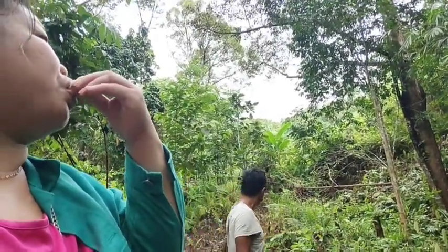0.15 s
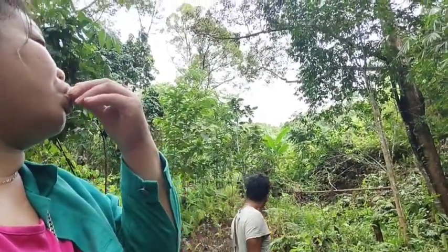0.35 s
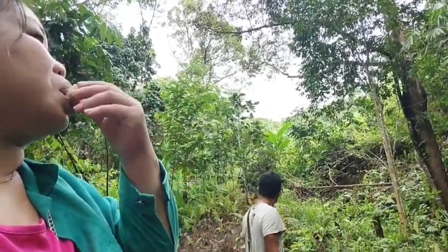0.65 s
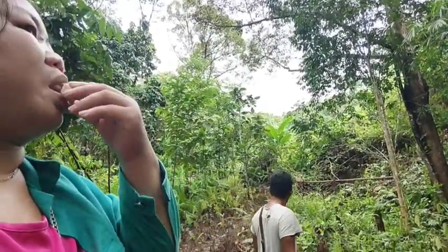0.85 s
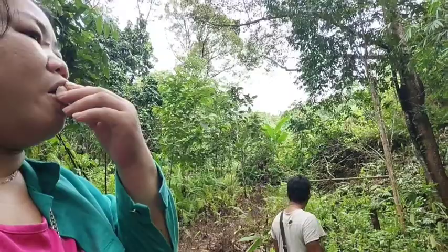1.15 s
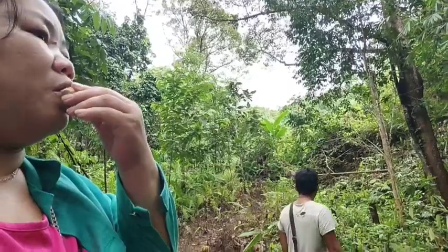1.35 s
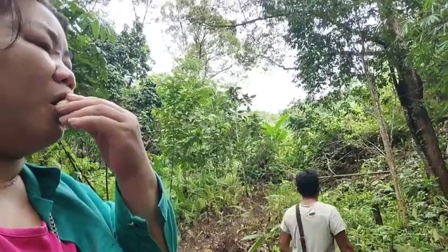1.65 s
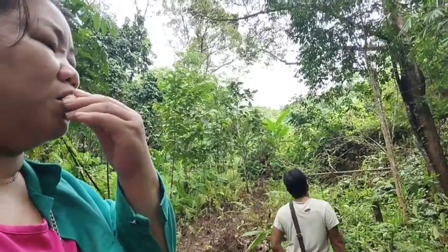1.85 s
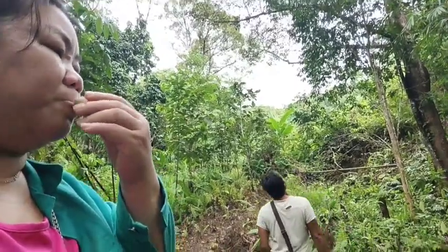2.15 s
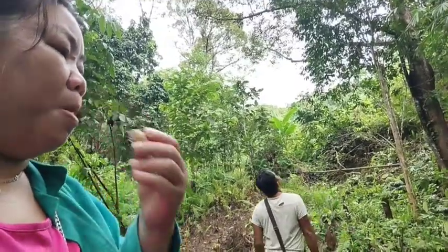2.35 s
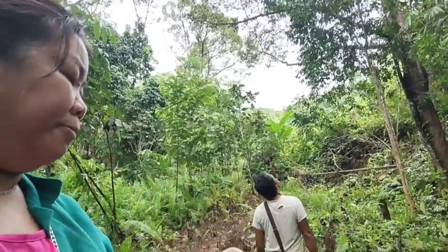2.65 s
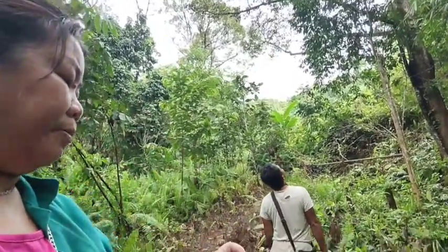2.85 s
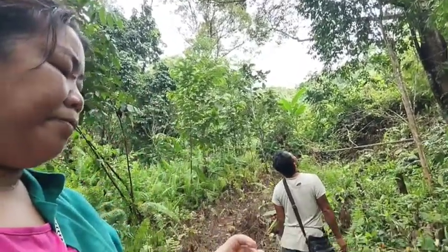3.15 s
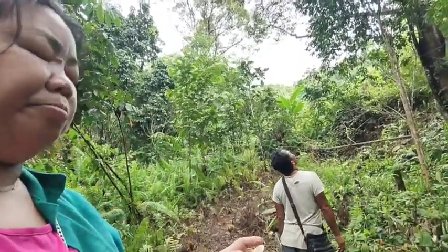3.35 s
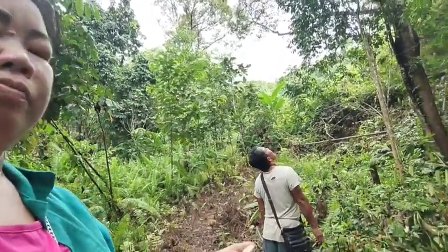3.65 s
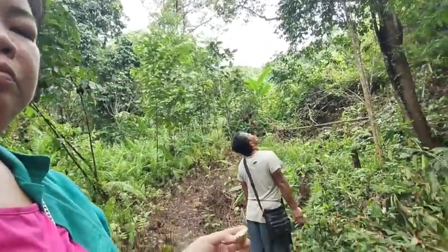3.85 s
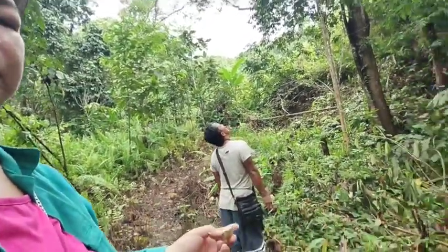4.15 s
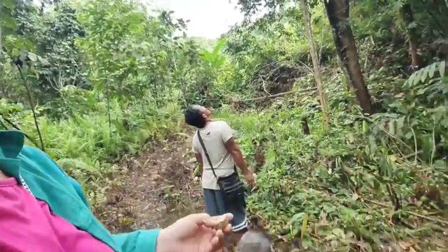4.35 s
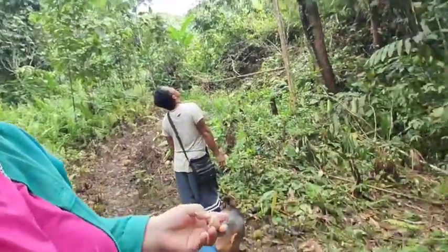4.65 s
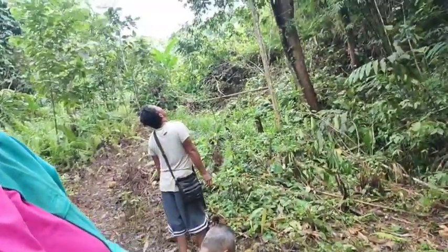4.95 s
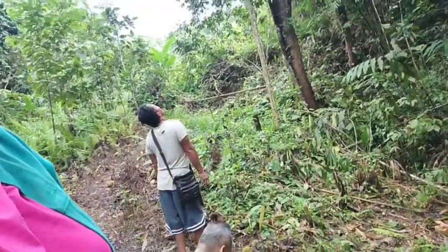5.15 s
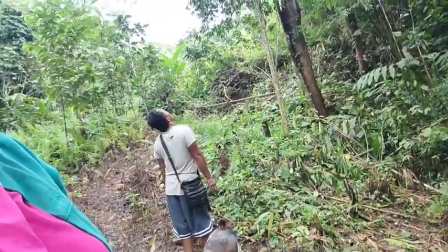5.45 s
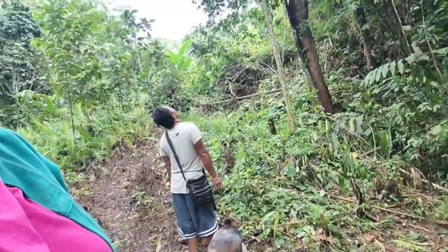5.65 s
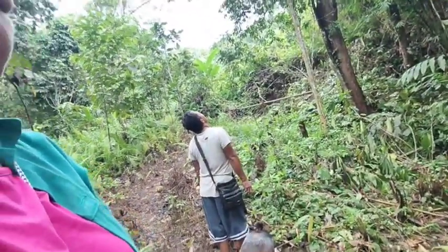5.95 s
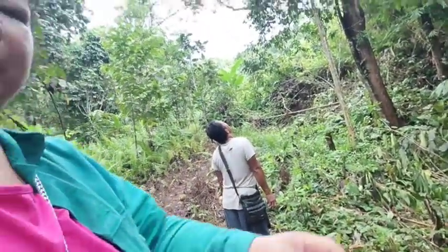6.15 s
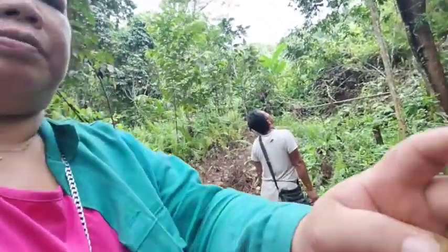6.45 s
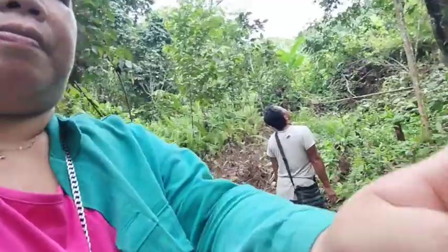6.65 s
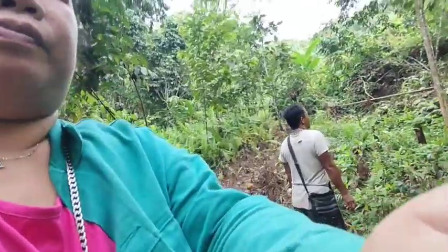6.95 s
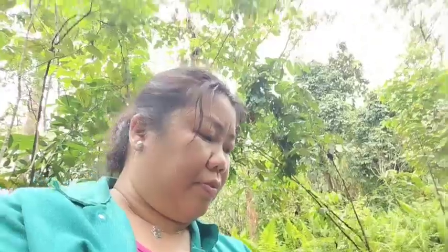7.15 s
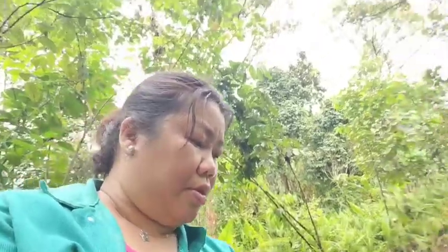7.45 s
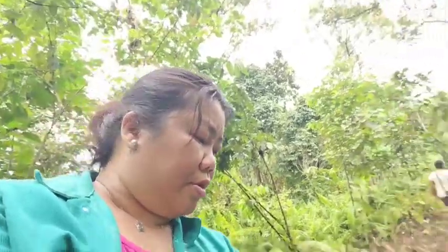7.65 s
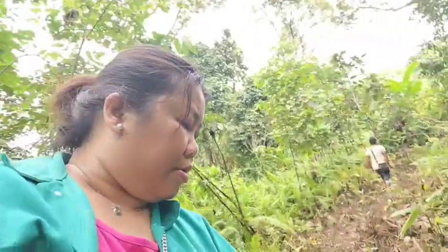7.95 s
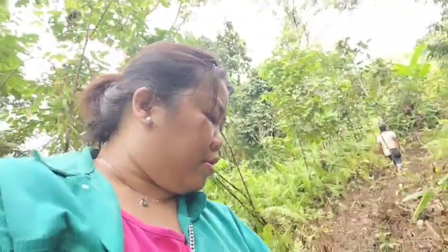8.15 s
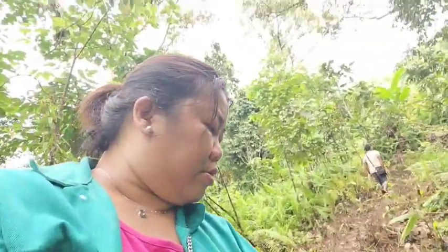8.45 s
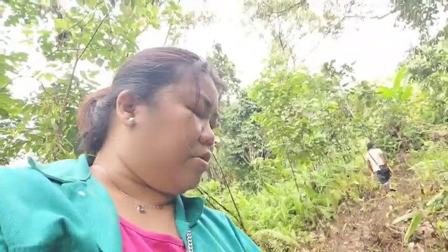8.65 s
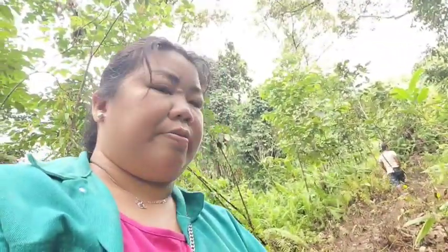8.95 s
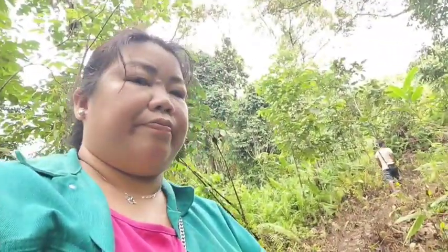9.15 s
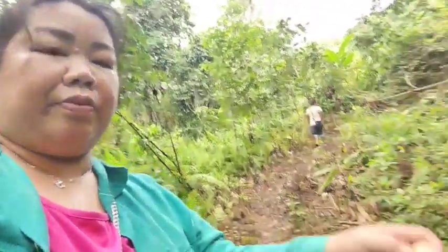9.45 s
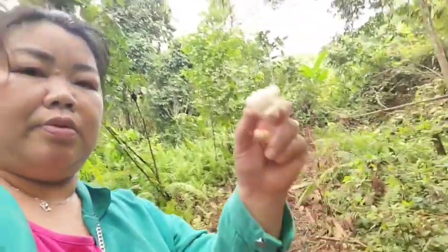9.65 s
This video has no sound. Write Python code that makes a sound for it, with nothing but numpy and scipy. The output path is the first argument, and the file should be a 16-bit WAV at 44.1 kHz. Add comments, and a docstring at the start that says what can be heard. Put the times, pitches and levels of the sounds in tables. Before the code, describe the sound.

A steady, high-pitched insect chorus fills a dense forest throughout: a fast pulsing trill around 6 kHz, a smooth hiss near 7 kHz and a finely fluttering buzz near 8 kHz, with airy overtones above and a soft, wide leafy hush below. Close to the microphones someone eats fruit. At 0.1 s a small tongue cluck sounds; at 0.9 s a crisp wet lip smack; at 1.3 s a faint crackle; at 2.1 s another juicy, hollow smack; at 2.9 s a much weaker one. At 3.87 s a thin, bright snap cracks sharply. Tiny pops and ticks follow from 4.3 to 6 s. At about 6.96 s all sound stops, stays silent until 7.1 s, then fades in by 7.25 s. A short thump on the right microphone comes at 7.33 s, with light rustles. The chorus continues, trills a little stronger, with faint ticks and rustles around 8.2 and 9 s.

```python
"""Forest insects and a fruit eater

A dense forest filled with three crowds of insects, each made of random clicks ringing its own resonances,
over a soft leafy hush of filtered noise. Close to the microphones someone eats fruit: lips smack, the tongue
clucks and something thin snaps (short sagging tones), amid short crackles and rustles (clumped noise bursts).
Once the sound is cut, stays silent and fades back in; then a finger bumps the right microphone (an air pulse).
"""
import sys
import numpy as np
from scipy import signal
from scipy.io import wavfile

SR = 44100
rng = np.random.default_rng(int(sys.argv[2]) if len(sys.argv) > 2 else 0)


def store_pcm(level_fs):
    """Save levels as 16-bit WAV."""
    pcm = np.round(np.clip(level_fs, -1, 1) * 32767).astype(np.int16)
    wavfile.write(sys.argv[1], SR, np.atleast_2d(pcm).T)


N = 432180

# Spectrum of the leafy hush. Each row: frequency in Hz, relative level per Hz in dB.
HUSH_SPECTRUM = [(40, -14.5), (90, 3.5), (150, 1.5), (400, -3), (800, -2), (1500, -4.5), (2200, -4.5),
                 (3000, -4.5), (3600, -5.5), (4800, -11), (6500, -13), (8000, -30), (9800, -31),
                 (15000, -13.5)]
# Likeness of the hush at the two microphones. Each row: frequency in Hz, correlation (clipped to -1..1).
HUSH_LIKENESS = [(60, 0.76), (150, 0.72), (380, 0.84), (950, 0.16), (2380, 0.043), (5980, -0.3),
                 (15000, -1.4)]

# Resonances of the three insect crowds.
# Each row: centre in Hz, width of each of two passes in Hz, relative level in dB, left over right in dB.
TRILLER_MODES = [(5620, 700, -3, 0.5), (5995, 200, 0.5, 5.5), (6185, 200, 0.5, -1),
                 (11440, 1400, -3.5, 2.5), (12070, 330, -2.5, 2), (12420, 350, -2, 4.5)]
HISSER_MODES = [(6720, 520, -6, 6), (7075, 470, -1, 6.9), (7440, 320, -8.5, 4), (13350, 600, -19.5, 5),
                (14100, 460, -12, 7.9), (14300, 400, -14, 8), (15400, 2300, -9.5, 12)]
BUZZER_MODES = [(7720, 320, -4.5, 1), (7924, 214, -2, -1.5), (8132, 226, -3.5, -5), (8420, 200, -16, -2),
                (8680, 300, -21, -0.5)]
# The nearest singers. Each row: bursts per second, left over right in dB (halved, as it scales power).
NEAR_TRILLERS = [(13.5, 9), (13.08, -9)]
NEAR_BUZZERS = [(47.85, 0)]
# Strokes within one burst. Each row: start in turns, level in dB (halved, as it scales power).
TRILL_STROKES = [(0, 0), (.31, -1.5)]
BUZZ_STROKES = [(0, 0)]
# Slow level of the chorus. Each row: time in seconds, offset of trillers, hissers and buzzers in dB.
CHORUS_LEVELS = [(0, 0, 0, 0.5), (1.2, .5, 0, 0.1), (2.8, -0.2, .3, 0), (3.7, -1, 0, -.3),
                 (4.1, -0.5, 0, .5), (4.6, -0.7, -0.5, -.5), (5.6, 0, 0, -1), (6.2, -1, 0, -1),
                 (6.9, -1.5, -0.7, -0.5), (7.5, 2, 0, 0), (8.6, 1, -1, 1.5), (9.8, 2.3, -0.3, -1.5)]

# Small pops and pips close by. Each row: start in seconds, peak in dB before roughness, pitch at the start
# in Hz, swell in seconds.
POPS = [(.0370, -54, 477, .0027), (.9120, -48, 500, .003), (.9230, -52, 930, 0.0028),
        (2.555, -57, 625, .0094), (2.890, -57, 430, 0.012), (2.905, -55, 150, .008),
        (2.930, -55, 430, .009), (3.8690, -47, 468, .0015), (4.2660, -55, 2450, .004),
        (4.3100, -56, 700, .004), (4.2670, -59, 2250, .003), (4.3350, -59, 1900, .003),
        (4.3350, -61, 2300, .003), (4.5050, -60, 2650, .005), (5.1800, -56, 720, .004),
        (5.4110, -56, 2450, .002), (5.4110, -57, 3300, .002), (5.7620, -49, 334, 0.0018),
        (6.0370, -52.5, 189, .005), (8.7500, -63, 2350, .005), (8.9380, -62, 2380, .006),
        (8.9700, -62, 2380, .005), (9.0020, -57, 2320, .005)]
# Short crackles and rustles: clumped bursts of filtered noise.
# Each row: start in seconds, level in dB, centre in Hz, nominal width in Hz, swell in seconds.
CRACKLES = [(.0980, -52, 1900, 2500, .011), (1.2840, -50, 6000, 9000, .006),
            (3.8660, -54, 1200, 2000, .004), (3.8770, -48, 3000, 2500, .004),
            (4.2650, -60, 2300, 700, 0.005), (5.3850, -58, 2470, 400, .012),
            (5.9320, -54, 3180, 1500, 0.0043), (7.255, -57, 5000, 8000, 0.02),
            (7.280, -54.5, 3600, 2500, 0.016), (7.290, -55, 8000, 8000, 0.015),
            (7.2855, -46, 7000, 9000, .0005), (8.2000, -60, 8000, 6000, 0.02),
            (8.2350, -59, 8000, 6000, 0.018), (8.2200, -63, 2800, 600, 0.015),
            (8.8500, -63, 2900, 900, 0.04), (9.1000, -62, 7000, 6000, 0.02),
            (9.1300, -55.5, 4400, 2400, 0.011), (9.1600, -60, 7000, 6000, .02)]
# Wet spray thrown by smacks and clicks.
# Each row: start in seconds, level at the top band in dB, brightness in dB per octave.
SPRAYS = [(0.0883, -48.5, -2.5), (.8910, -34.5, -0.5), (2.0744, -36.5, -1), (2.8780, -66, -4.5),
          (3.8734, -43, 0.5)]
# Bands of every spray. Each row: centre in Hz, nominal width in Hz, relative level in dB, swell in seconds,
# left over right in dB.
SPRAY_BANDS = [(12600, 7900, -2, 0.0045, 4.5), (4150, 1400, -7.5, 0.0038, 3.5),
               (1880, 2000, -13, 0.0093, 2.5), (600, 890, -12.5, 0.01, -1.5)]
# The tongue's cluck and the thin snap. Each: start in seconds, level in dB, left over right in dB.
CLUCK = (0.0893, -34, 4.2)
SNAP = (3.8742, -25, -1)
# What they ring with. Each row: delay in seconds, pitch in Hz, relative level in dB, swell in seconds.
CLUCK_RINGS = [(0, 1110, -1.5, .0008), (0, 1910, -4, .0006), (.0003, 3700, -11, .0007),
               (.003, 1150, -6.5, 0.0016), (.004, 1610, -9, 0.0019), (.0052, 3800, -11, .0015),
               (.012, 910, -14, .003)]
SNAP_RINGS = [(0, 7270, -1, .0003), (.0001, 8360, -5, 0.0004), (0, 1030, -15, 0.0015),
              (.0022, 2760, -3.5, .0003), (.003, 7400, -12, .001), (.0035, 3850, -20, .001),
              (.0005, 303, -23.5, 0.0022)]
# Lip smacks. Each row: start in seconds, lips level in dB, lips pitch in Hz, lips swell in cycles, lips sag
# per second, second hollow's pitch in Hz, its level in dB, opening time in seconds, cavity level in dB,
# cavity pitch in Hz, jaw level in dB, jaw pitch in Hz, left over right in dB (halved for cavity and jaw).
SMACKS = [(0.891, -24.5, 490, 0.85, 30, 800, -35, 0.0125, -31.5, 310, -36.5, 105, 4),
          (2.0748, -31, 840, 1.2, 20, 440, -29.5, 0.0120, -26.5, 215, -42, 175, 5),
          (2.8790, -42, 650, 0.6, 30, 420, -49, 0.0015, -55, 270, -43, 155, 4)]

# The hush and the insects
TRILL_DB, HISS_DB, BUZZ_DB, HUSH_DB = -64, -55.5, -54.5, -56.5  # base levels
LEFT_LATE = 14  # samples by which the hush reaches the left port later
RATE_WAVER = .002  # typical share by which a near singer's tempo wavers
TRILL_SHARP, BUZZ_SHARP = 16, 7  # swell times per turn: higher means shorter strokes
TRILL_DEPTH, BUZZ_DEPTH = .45, .33  # share of the crowd's power that is near
SHIMMER_DB, SHIMMER_HZ = 0.8, 4  # each resonance wavers on its own as single singers stand out
GAP_LOW_HZ, GAP_HIGH_HZ = 8850, 10750  # band-stop edges for insects and hush

# The mouth close by
SECOND_LATE_S = 0.002  # the second hollow joins the lips
CAVITY_SWELL_S, CAVITY_SAG_PER_S = 0.0019, 30
CAVITY_AT = 0.416  # share of the opening time at which the cavity answers
JAW_SWELL_S, JAW_SAG_PER_S = 0.0033, 8  # thuds at the end of the opening
RING_SAG_PER_S = 3.2
POP_SAG = 0.006  # pitch divides by 1 plus this over one swell time
POP_ROUGH_DB, POP_ROUGH_S = 2.5, .003  # wet walls make a pop's level stumble
GRAIN = 0.5  # unevenness of the tiny clicks in a crackle
LUMP_DB, LUMP_S = 3, 0.00398  # a crackle comes in clumps
WIDER = 1.55  # widens both passes so that together they keep the nominal width with steeper flanks

# The microphones
BUMP_S, BUMP_DB, BUMP_RISE_S, BUMP_FALL_S = 7.3288, -22, 0.0004, 0.0014
BUMP_LEFT_DB = -20  # left relative to right
CUT_S, RETURN_S, FULL_S = 6.9592, 7.110, 7.25  # sound stops, starts back, reaches full level
PORT_HZ, CUTOFF_HZ = 90, 15480


def from_db(db):
    """Convert decibels to gain."""
    return 10 ** (np.asarray(db) / 20)


def rms_one(x):
    """Scale to unit power."""
    return x / np.sqrt(np.mean(x ** 2) + 1e-20)


def at_hz(points, hz):
    """Read a spectrum on a log-frequency axis."""
    points = np.array(points)
    return np.interp(np.log(hz), np.log(points[:, 0]), points[:, 1])


def sides(pan_db):
    """Give the left and right gains for a source off to one side."""
    return from_db([[pan_db / 2], [-pan_db / 2]])


def drift(rate_hz):
    """Wander slowly at random with spread 1: noise smoothed by two equal poles, one value per 40 samples."""
    r = np.exp(-80 * np.pi * rate_hz / SR)
    noise = rng.standard_normal(N // 40 + 4002)
    slow = signal.lfilter([1], [1, -2 * r, r * r], noise)[4000:]  # drop the settling
    return np.interp(np.arange(N) / 40, np.arange(len(slow)), rms_one(slow))


def resonate(x, hz, width):
    """Ring one two-pole resonance, gain 1 on top."""
    r = np.exp(-np.pi * width / SR)
    poles = [1, -2 * r * np.cos(2 * np.pi * hz / SR), r * r]
    return signal.lfilter([(1 - r * r) / 2, 0, (r * r - 1) / 2], poles, x)


def resonate_twice(x, hz, width):
    """Pass one resonance twice for steep flanks."""
    return resonate(resonate(x, hz, width), hz, width)


def swell(t, db, swell_s):
    """Rise to a peak in swell_s, then die away more slowly."""
    return from_db(db) * t / swell_s * np.exp(1 - t / swell_s)


def add(out, s, sound):
    """Mix a short sound in at time s."""
    i = round(s * SR)
    out[:, i:i + sound.shape[1]] += sound


def hush(patchy_db):
    """Leaves and distance: half-octave noise bands, most alike at both microphones in the low bands."""
    out = 0
    together = drift(10.0)
    edges = 30 * 2 ** np.arange(0, 9.6, .5)
    white = rng.standard_normal((2, 2, N))
    for k, (low, high) in enumerate(zip(edges, edges[1:])):
        band = signal.butter(2, [low, high], "band", fs=SR, output="sos")
        mid, side = signal.sosfilt(band, white[k % 2])  # neighbouring bands use separate noises
        hz = np.sqrt(low * high)
        alike = np.clip(at_hz(HUSH_LIKENESS, hz), -1, 1)
        patches_db = patchy_db * (0.45 * together + drift(14.5))
        gain = from_db(at_hz(HUSH_SPECTRUM, hz) + patches_db)
        shared = np.sqrt(1 + alike) * mid
        opposed = np.sqrt(1 - alike) * side * [[1], [-1]]
        out = out + gain * (shared + opposed)
    out[0] = np.roll(out[0], LEFT_LATE)
    return rms_one(out)


def throb(singers, strokes, sharp, depth):
    """Power of a crowd: near singers burst at their own wavering rates over the even blur of the far ones."""
    bursts = 0
    for hz, pan_db in singers:
        turns = np.cumsum(hz * (1 + RATE_WAVER * drift(0.45))) / SR + rng.random()
        near = from_db(2.7 * drift(0.42)) * sides(pan_db)
        for start, db in strokes:
            bursts = bursts + near * swell((turns - start) % 1, db, 1 / sharp)
    depth = np.clip(depth, 0, 1)
    return 1 - depth + depth * bursts / bursts.mean(axis=1, keepdims=True)


def crowd(modes, power, clicks_per_s, flicker_db):
    """Random clicks, other ones at each microphone, excite the resonances of one kind of singer."""
    struck = rng.random((2, N)) < clicks_per_s / SR
    clicks = struck * rng.standard_normal((2, N)) + 1e-18
    clicks = rms_one(clicks) * np.sqrt(power) * from_db(flicker_db * drift(3))
    out = 0
    for k, (hz, width, db, pan_db) in enumerate(modes):
        ringing = resonate_twice(clicks, hz, width) * np.sqrt(SR / width)
        gain = from_db(db + SHIMMER_DB * drift(SHIMMER_HZ)) * sides(pan_db)
        out = out + (-1) ** k * gain * ringing  # alternate sign from mode to mode
    return out


def insects():
    """Trillers and buzzers throb, hissers do not; each crowd's level drifts over the scene."""
    s, *levels = np.transpose(CHORUS_LEVELS)
    trill_db, hiss_db, buzz_db = (np.interp(np.arange(N) / SR, s, db) for db in levels)
    trill_power = throb(NEAR_TRILLERS, TRILL_STROKES, TRILL_SHARP, TRILL_DEPTH)
    buzz_power = throb(NEAR_BUZZERS, BUZZ_STROKES, BUZZ_SHARP, BUZZ_DEPTH)
    trillers = crowd(TRILLER_MODES, trill_power, clicks_per_s=30000, flicker_db=0.5)
    hissers = crowd(HISSER_MODES, 0.98, clicks_per_s=30000, flicker_db=0.5)
    buzzers = crowd(BUZZER_MODES, buzz_power, clicks_per_s=30000, flicker_db=0.5)
    chorus = from_db(TRILL_DB + trill_db) * trillers
    chorus = chorus + from_db(HISS_DB + hiss_db) * hissers
    return chorus + from_db(BUZZ_DB + buzz_db) * buzzers


def bump():
    """A sudden push of air on the right port, far weaker on the left, that leaks away."""
    t = np.maximum(np.arange(N) / SR - BUMP_S, 0)
    gains = from_db([[BUMP_DB + BUMP_LEFT_DB], [BUMP_DB]])
    return gains * (1 - np.exp(-t / BUMP_RISE_S)) * np.exp(-t / BUMP_FALL_S)


def pop(db, hz, swell_s, sag_per_s, pan_db):
    """Starts with a suction, sags in pitch as the cavity opens and stumbles more as it dies."""
    t = np.arange(SR // 2) / SR
    turns = np.cumsum(hz / (1 + sag_per_s * t)) / SR
    stumble = np.interp(t / POP_ROUGH_S, np.arange(1000), rng.standard_normal(1000))
    stumble = stumble * np.minimum(t / swell_s / 2, 1)
    level = swell(t, db + POP_ROUGH_DB * stumble, swell_s)
    return -sides(pan_db) * level * np.sin(2 * np.pi * turns)


def crackle(db, hz, width, swell_s, pan_db):
    """Tiny uneven clicks ring a wide band, in clumps."""
    t = np.arange(SR // 2) / SR
    lumps = LUMP_DB * np.interp(t / LUMP_S, np.arange(1000), rng.standard_normal(1000))
    clicks = rng.standard_normal((2, len(t))) * rng.exponential(1, len(t)) ** GRAIN
    grains = rms_one(resonate_twice(clicks, hz, WIDER * width))
    return sides(pan_db) * swell(t, db + lumps, swell_s) * grains


def small_noises(out):
    """Single pops ring one sagging tone each; crackles and rustles are clumped bursts of filtered noise."""
    for s, db, hz, swell_s in POPS:
        add(out, s, pop(db, hz, swell_s, POP_SAG / swell_s, 0.87))
    for s, db, hz, width, swell_s in CRACKLES:
        add(out, s, crackle(db, hz, width, swell_s, 0))


def wet_spray(out):
    """Spray crackles in several bands at once, tilted in brightness from one throw to the next."""
    top_hz = SPRAY_BANDS[0][0]
    for s, spray_db, bright_db in SPRAYS:
        for hz, width, db, swell_s, pan_db in SPRAY_BANDS:
            tilt_db = bright_db * np.log2(hz / top_hz)
            add(out, s, crackle(spray_db + db + tilt_db, hz, width, swell_s, pan_db))


def cluck_and_snap(out):
    """The tongue's dull cluck and the thin snap each ring in a few short steps."""
    for (s, db, pan_db), rings in ((CLUCK, CLUCK_RINGS), (SNAP, SNAP_RINGS)):
        for delay_s, hz, mode_db, swell_s in rings:
            add(out, s + delay_s, pop(db + mode_db, hz, swell_s, RING_SAG_PER_S, pan_db))


def lip_smacks(out):
    """A smack layers lips, second hollow, cavity and jaw tones at short delays; the jaw follows the cavity."""
    for (s, db, hz, cycles, sag_per_s, second_hz, second_db, opening_s,
         cavity_db, cavity_hz, jaw_db, jaw_hz, pan_db) in SMACKS:
        lips_swell_s = cycles / hz
        lips = pop(db, hz, lips_swell_s, sag_per_s, pan_db)
        second = pop(second_db, second_hz, lips_swell_s, sag_per_s, pan_db)
        cavity = pop(cavity_db, cavity_hz, CAVITY_SWELL_S, CAVITY_SAG_PER_S, pan_db / 2)
        jaw = pop(jaw_db, jaw_hz, JAW_SWELL_S, JAW_SAG_PER_S, pan_db / 2)
        add(out, s, lips)
        add(out, s + SECOND_LATE_S, second)
        add(out, s + CAVITY_AT * opening_s, cavity)
        add(out, s + opening_s, jaw)


def close_by():
    """Everything near the microphones: small noises, spray, cluck, snap and smacks."""
    out = np.zeros((2, N))
    small_noises(out)
    wet_spray(out)
    cluck_and_snap(out)
    lip_smacks(out)
    return out


def scene():
    """The forest passed through a band-stop filter, then the near sounds and the bump on top."""
    forest = from_db(HUSH_DB) * hush(patchy_db=1.1) + insects()
    gap = signal.butter(2, [GAP_LOW_HZ, GAP_HIGH_HZ], "bandstop", fs=SR, output="sos")
    return signal.sosfilt(gap, forest) + close_by() + bump()


def record(dry):
    """The ports lose the deep bass; a cut, silence and a straight fade back; the extreme treble is cut."""
    t = np.arange(N) / SR
    fade = np.where(t < CUT_S, 1, np.clip((t - RETURN_S) / (FULL_S - RETURN_S), 0, 1))
    ports = signal.butter(2, PORT_HZ, "high", fs=SR, output="sos")
    heard = fade * signal.sosfilt(ports, dry)
    top_cut = signal.ellip(12, .5, 70, CUTOFF_HZ, fs=SR, output="sos")
    return signal.sosfilt(top_cut, heard)


dry = scene()
out = record(dry)
store_pcm(out)
```